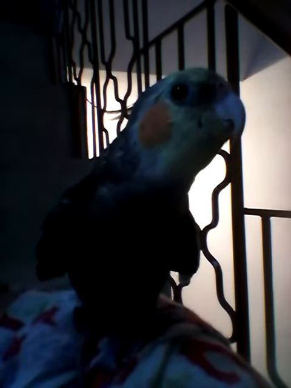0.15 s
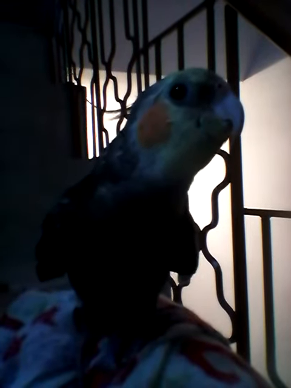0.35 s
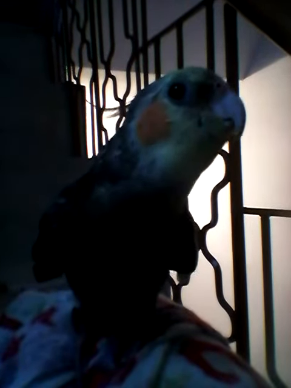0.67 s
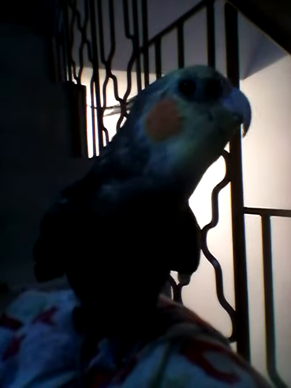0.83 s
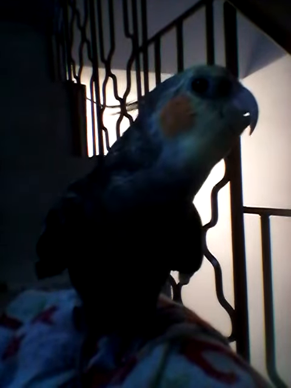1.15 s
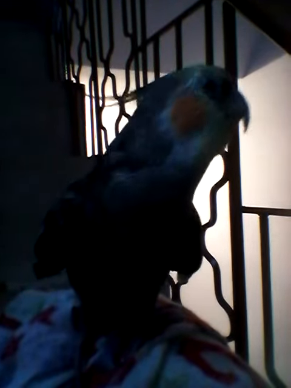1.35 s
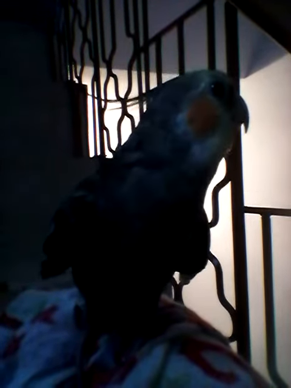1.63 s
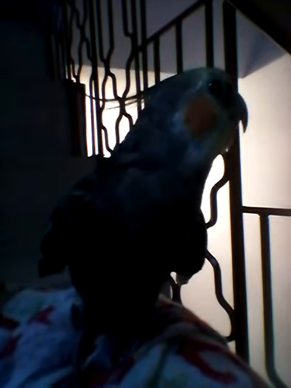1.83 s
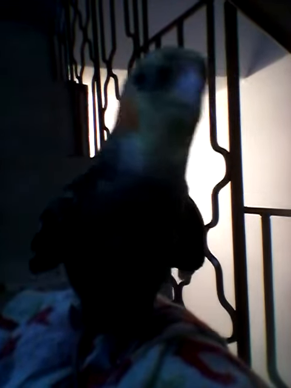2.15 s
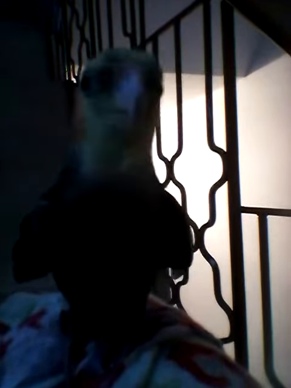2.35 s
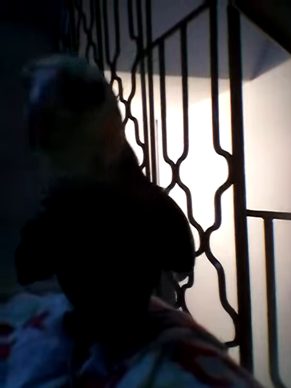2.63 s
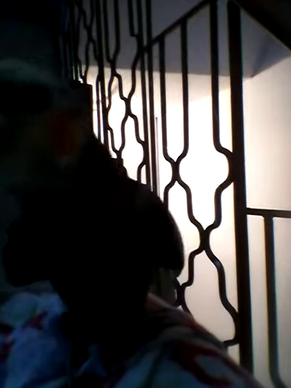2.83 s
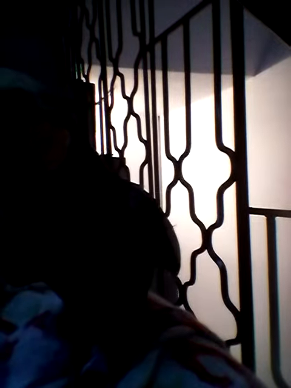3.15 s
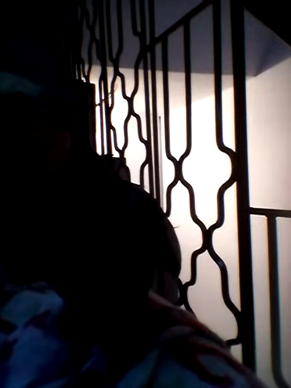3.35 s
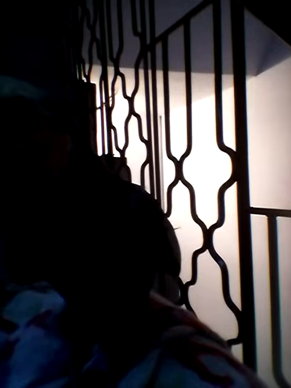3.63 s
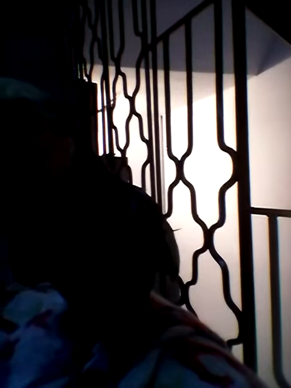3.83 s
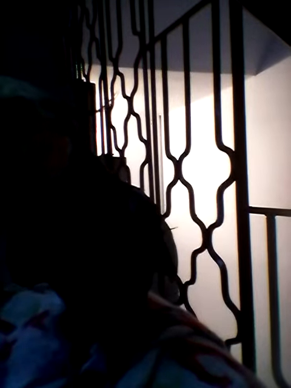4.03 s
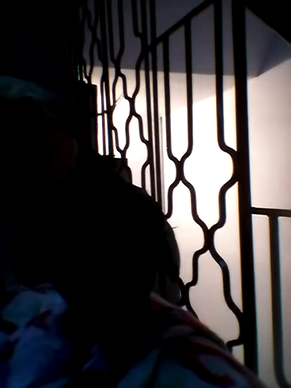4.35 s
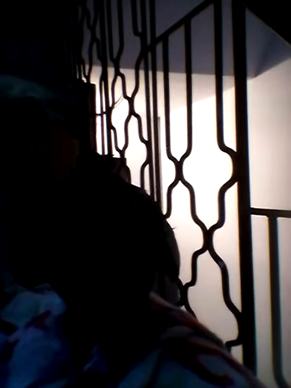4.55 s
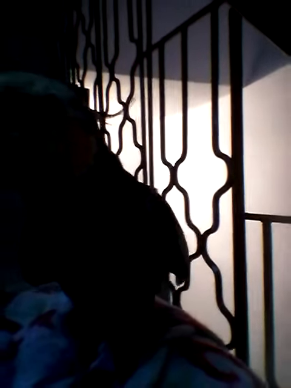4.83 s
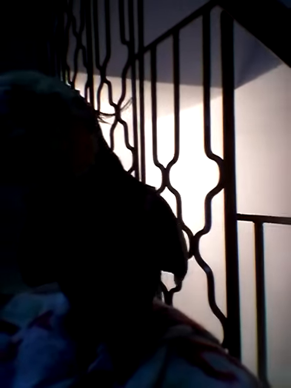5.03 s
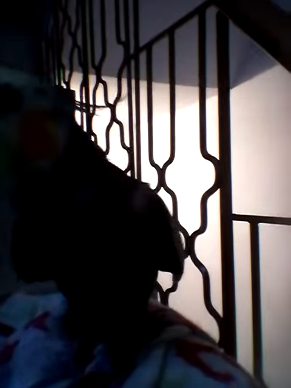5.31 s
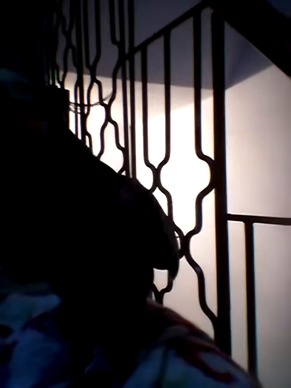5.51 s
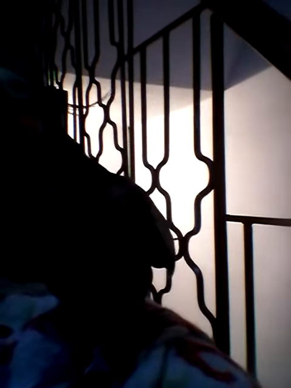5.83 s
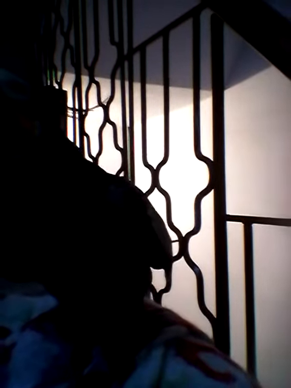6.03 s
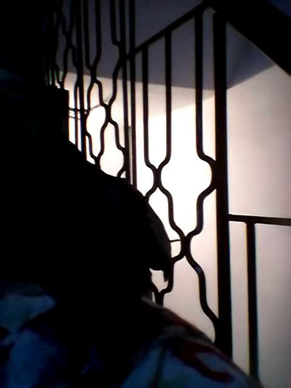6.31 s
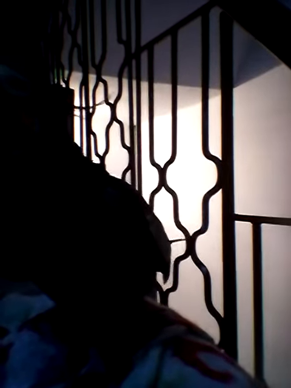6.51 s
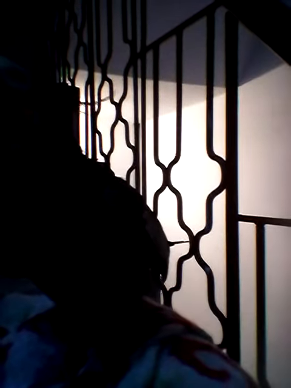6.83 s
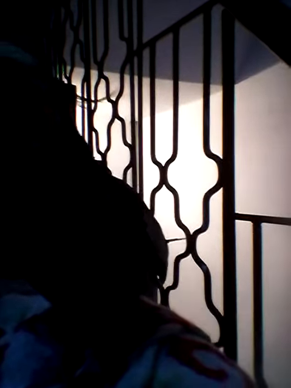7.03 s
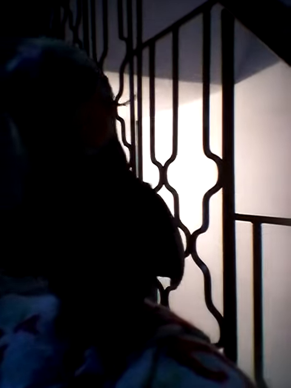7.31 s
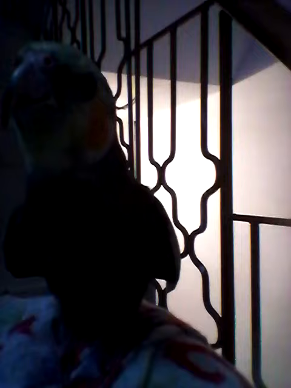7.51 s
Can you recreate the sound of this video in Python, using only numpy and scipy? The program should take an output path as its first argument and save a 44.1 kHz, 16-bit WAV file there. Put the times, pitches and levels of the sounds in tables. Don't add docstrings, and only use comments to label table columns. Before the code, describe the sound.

Indoors in a hard, reverberant room, steady thin insect sizzle and low distant murmur lie under a pet bird's loud whistling. The first phrase mixes held notes and quick chirps, fading into low, reedy tones. Silence but for background follows, then a second phrase climbs to a high whistle and finishes with its loudest note. A distant bird adds a thin chip early and a rough squawk later. Phone sound, bass-light, slightly overloaded on peaks.

```python
import sys
import numpy as np
from scipy import signal
from scipy.fft import rfft, irfft, next_fast_len
from scipy.io import wavfile
from scipy.ndimage import uniform_filter1d, minimum_filter1d

SR = 44100
rng = np.random.default_rng(int(sys.argv[2]) if len(sys.argv) > 2 else 0)


def invert_db(level):
    return 10 ** (np.asarray(level, dtype=float) / 20)


def wav_out(sig):
    wavfile.write(sys.argv[1], SR, np.round(np.clip(np.atleast_2d(sig).T, -1, 1) * 32767).astype(np.int16))


N = 338247


def rms_one(x):
    return x / np.sqrt(np.mean(x ** 2) + 1e-20)


def at_hz(points, hz):
    known_hz, values = np.array(points)[:, 0], np.array(points)[:, 1]
    return np.interp(np.log(np.maximum(hz, 1)), np.log(known_hz), values)


def drift(rate_hz):
    r = np.exp(-2 * np.pi * rate_hz / SR)
    noise = rng.standard_normal(N + SR)
    return rms_one(signal.lfilter([1], [1, -2 * r, r * r], noise)[SR:])


def resonances(x, modes):
    out = 0
    for k, (hz, width, level_db) in enumerate(modes):
        r = np.exp(-np.pi * width / SR)
        ring = signal.lfilter([1, 0, -1], [1, -2 * r * np.cos(2 * np.pi * hz / SR), r * r], x)
        out = out + (-1) ** k * invert_db(level_db) * (1 - r * r) / 2 * ring
    return out


# frequency in Hz, level in dB per Hz.
MURMUR_COLOUR = [(120, -30), (200, -14), (380, 0), (1000, -6.5), (2000, -12), (3000, -15), (4300, -10),
                 (4900, -13), (5500, -9), (7600, -14), (9700, -24), (10900, -18), (12500, -24),
                 (15500, -22)]


def murmur():
    size = next_fast_len(N)
    colour = invert_db(at_hz(MURMUR_COLOUR, np.arange(size // 2 + 1) * SR / size))
    noise = irfft(rfft(rng.standard_normal(size)) * colour, size)[:N]
    return invert_db(-47.5) * rms_one(noise)


# frequency in Hz, width in Hz, level in dB.
INSECT_WINGS = [(6882, 198, -1), (6667, 266, -1.5), (5970, 600, -16.5)]


def insects():
    wing_hz, chirp_hz, level_db = 75.3, 9.6, -39.5
    t = np.arange(N) / SR
    wings_db = 0.89 * np.sin(2 * np.pi * wing_hz * t + 2.7 * drift(2.2))
    chirps_db = np.sin(2 * np.pi * chirp_hz * t + 1.3 * drift(0.17))
    band = resonances(resonances(rng.standard_normal(N), INSECT_WINGS), [(6310, 1400, 0)])
    return invert_db(level_db) * rms_one(band * invert_db(wings_db + chirps_db + 0.7 * drift(0.17)))


# start in seconds, level in dB, length in seconds.
PUFFS = [(0.668, -33.5, 0.027), (1.134, -32.5, 0.04), (1.396, -35.5, 0.042), (1.944, -50, 0.031),
         (2.189, -29.5, 0.023), (2.46, -30.5, 0.028), (2.762, -33, 0.033), (3.043, -32, 0.03),
         (5.051, -32.5, 0.017), (5.513, -30.5, 0.031), (5.777, -30.5, 0.026), (6.281, -33, 0.035),
         (6.56, -33, 0.038), (6.824, -28, 0.025), (7.104, -31, .04)]
# frequency in Hz, width in Hz, level in dB.
THROAT = [(600, 1460, -9.5), (1600, 1940, -1), (2400, 330, 7), (3800, 3600, -24.5)]


def puffs():
    t, shape = np.arange(N) / SR, np.zeros(N)
    for s, level_db, length in PUFFS:
        corners = [s, s + 0.063 * length, s + length, s + length]
        shape += invert_db(level_db) * np.interp(t, corners, [0, 0.98, 1, 0])
    air = resonances(rng.standard_normal(N), THROAT)
    soft_air = signal.sosfilt(signal.butter(3, 4300, fs=SR, output="sos"), air)
    return shape * rms_one(soft_air)


# lift-off in dB, share of the leap done at the shoulder, fade while held in dB,
# fall in seconds, fall as a pitch ratio, fall in dB.
PIP_MANNER = (-27, .94, -3, .008, .94, -19)
CREEP_MANNER = (-30, .75, -1.5, 0.0074, .97, -18)
ARCH_MANNER = (-30, .85, -2.5, .016, .72, -13)


def short_note(row, manner):
    s, climb, length, top, level_db = row
    lift_db, shoulder, fade_db, fall, ratio, fall_db = manner
    bow = 0.27
    low = max(1620, top - 700)
    held = length - climb - fall
    sag, end = 0.98 * top, ratio * top
    return [(s, low, lift_db),
            (s + climb, low + shoulder * (top - low), level_db - 1),
            (s + climb + 0.65 * held, top, level_db),
            (s + climb + held, sag, level_db + fade_db),
            (s + length - fall / 2, sag + bow * (end - sag), level_db + fade_db + bow * fall_db),
            (s + length, end, level_db + fall_db)]


def scooped(note):
    (s0, hz0, db0), (s1, hz1, db1) = note[:2]
    wait = (s0 - 0.012, hz0, db0 - 12)
    halfway = ((s0 + s1) / 2, hz0 + 0.54 * (hz1 - hz0), db0 + 0.67 * (db1 - db0))
    return [wait, note[0], halfway, *note[1:]]


# time in seconds, pitch in Hz, level in dB.
OPENING = [(.686, 1560, -25), (.709, 1905, -10.5), (.719, 2371, -7), (.731, 2429, -12.5),
           (.789, 2500, -8.5), (.877, 2390, -19.5), (.937, 2419, -13), (.977, 2385, -10), (.985, 2470, -36)]
WARBLE = [(1.424, 1952, -26), (1.444, 2575, -10.5), (1.495, 2669, -10.5), (1.556, 2552, -11),
          (1.64, 2696, -13), (1.682, 2590, -10.5), (1.735, 2685, -11), (1.754, 2564, -7.5),
          (1.762, 1870, -20)]
LOW_RISE = [(3.062, 1468, -27), (3.178, 1674, -23), (3.219, 1709, -14.5), (3.248, 1750, -13.5),
            (3.262, 1758, -17.5), (3.275, 1692, -20.5), (3.29, 1598, -29.5), (3.305, 1510, -33)]
LOW_HOLD = [(3.327, 1525, -24.5), (3.426, 1794, -12.5), (3.475, 1664, -15.5), (3.553, 1807, -15),
            (3.589, 1786, -14.5), (3.616, 1685, -19), (3.736, 1744, -15), (3.764, 1765, -19),
            (3.768, 1786, -48)]
REOPENING = [(5.068, 1647, -25), (5.097, 2400, -10), (5.107, 2471, -9.5), (5.209, 2394, -7.5),
             (5.232, 2385, -16), (5.245, 2305, -22), (5.337, 2444, -6), (5.359, 2340, -15),
             (5.365, 2520, -25)]
HIGH_HOLD = [(5.801, 2000, -24), (5.824, 2535, -7.5), (5.858, 2889, -7), (5.883, 3013, -10.5),
             (6.035, 3082, -8.5), (6.093, 3014, -9), (6.103, 2994, -8), (6.113, 2750, -12),
             (6.12, 2670, -21)]
CLOSING = [(7.133, 1676, -26), (7.16, 2351, -4.5), (7.179, 2450, 0), (7.19, 2491, -6.5), (7.346, 2347, -8),
           (7.383, 2528, -12), (7.436, 2510, -6), (7.48, 2347, -15), (7.489, 1830, -43.5)]
# lift-off in seconds, climb in seconds, length in seconds, top pitch in Hz, level in dB.
PIPS = [
    (1.156, .024, .074, 2625, -9.5),
    (6.583, .026, .069, 2455, -6.5),
    (6.843, .034, .068, 2172, -7.5),
]
ARCHES = [
    (1.954, .026, .069, 2323, -8.5),
    (2.197, .038, .089, 2353, -9),
    (2.48, .028, .095, 2277, -18),
    (2.779, .04, .093, 2229, -11),
]
CREEPS = [
    (5.535, .015, .079, 2800, -6),
    (6.297, .018, .09, 2895, -4.5),
]


def song():
    kinds = [(PIPS, PIP_MANNER), (CREEPS, CREEP_MANNER), (ARCHES, ARCH_MANNER)]
    short = [short_note(row, manner) for rows, manner in kinds for row in rows]
    held = [OPENING, WARBLE, LOW_RISE, LOW_HOLD, REOPENING, HIGH_HOLD, CLOSING]
    in_order = sorted(short + held, key=lambda note: note[0][0])
    return [scooped(note) for note in in_order]


def glide(note, waver):
    s, hz_points, db_points = np.transpose(note)
    at = np.arange(round(s[0] * SR), round(s[-1] * SR))
    hz = uniform_filter1d(np.interp(at / SR, s, hz_points), size=130)
    level_db = uniform_filter1d(np.interp(at / SR, s, db_points), size=130)
    phase = np.cumsum(2 * np.pi * hz * (1 + waver[at]) / SR)
    edge = np.clip(np.minimum(at - at[0], (at[-1] - at) / 2) / 90, 0, 1)
    return at, hz, phase, np.sqrt(2) * invert_db(level_db) * edge


# frequency in Hz, dB relative to the note.
OCTAVE = [(3000, -24), (3500, -17.5), (4000, -21), (4300, -35), (4800, -36), (5300, -28), (6100, -26)]
# frequency in Hz, dB relative to the note.
WINDPIPE = [(4000, -20.5), (5200, -24.5), (6500, -30), (7500, -40), (9000, -42), (10500, -43), (12200, -52),
            (13800, -45), (15000, -58), (16000, -67)]
# frequency in Hz, dB relative to the note.
HALF_LINES = [(700, -39), (900, -52.5), (1250, -40), (1600, -59), (2000, -42.5), (2500, -37), (3000, -51),
              (3700, -42), (4600, -54.5), (6500, -54)]
# half tones in dB, octave in dB, high overtones in dB.
NOTE_COLOUR = [(0, 1.5, 0.6), (-1.5, -5, -4), (2.5, 1.5, 2.5), (6, -8, 0.6), (2, 2.5, 4), (5.5, -10, -3),
               (6, 1.5, -3), (7, 1.5, 1.2), (-3.5, 0.6, 2.2), (0.2, -3, -3), (-17, -2.5, -3),
               (-20, -2, 3.5), (-13, -1.5, 3.5), (-12, 2.5, 2.2), (-11, 4, 6), (-6, -1, 0.6)]


def cockatiel():
    out, waver, flicker = np.zeros(N), 0.0027 * drift(54), drift(22)
    slip = 0.55 * drift(150)
    breath = rms_one(resonances(rng.standard_normal(N), THROAT))
    for note, (half_db, twice_db, bright_db) in zip(song(), NOTE_COLOUR):
        at, hz, phase, swell = glide(note, waver)
        moving = np.tanh(np.abs(np.gradient(hz)) * SR / 15000)
        octave_db = at_hz(OCTAVE, 2 * hz) + twice_db + 2.5 * flicker[at - 900] + 6 * moving
        notch_db = -11 * np.exp(-((2 * hz - 4520) / 300) ** 2)
        tone = np.sin(phase) + invert_db(octave_db + notch_db) * np.sin(2 * phase)
        tone += invert_db(-42) * breath[at]
        effort_db = 2 * np.log10(swell / 0.83 + 0.027)
        for k in range(3, 9):
            level_db = at_hz(WINDPIPE, k * hz) + bright_db + effort_db + 3 * flicker[at - 900 * k]
            tone += (k * hz < 0.45 * SR) * invert_db(level_db) * np.sin(k * phase)
        soft_db = half_db - 8.5 * np.log10(swell / 0.36 + 0.022)
        for k in range(1, 8, 2):
            level_db = at_hz(HALF_LINES, k * hz / 2) + soft_db + 3.8 * flicker[at]
            tone += invert_db(level_db) * np.sin(k * phase / 2 + slip[at])
        out[at] += swell * tone
    return out


# time in seconds, pitch in Hz, level in dB.
OTHER_BIRD = [
    [(1.85, 3350, -46), (1.86, 3134, -37.5), (1.88, 3114, -43.5), (1.89, 3160, -34)],
    [(1.893, 4250, -50.5), (1.9, 3680, -32.5), (1.91, 3075, -45.5), (1.92, 2960, -31), (1.95, 2866, -44),
     (1.975, 2980, -51)],
]
# multiple of the pitch, level in dB.
OTHER_OVERTONES = [(2, -5), (3, -14), (4, -19)]


def other_bird():
    out, waver, shake = np.zeros(N), 0.0054 * drift(300), invert_db(1.6 * drift(200))
    for note in OTHER_BIRD:
        at, hz, phase, swell = glide(note, waver)
        overtones = sum(invert_db(level_db) * np.sin(k * phase) for k, level_db in OTHER_OVERTONES)
        out[at] += swell * shake[at] * (np.sin(phase) + overtones)
    return out


# start in seconds, length in seconds, centre in Hz, width in Hz, level in dB.
RASPS = [
    (1.876, .09, 4500, 3000, -43),
    (1.884, 0.079, 11000, 3880, -56),
    (5.87, 0.15, 3800, 700, -43.5),
    (5.963, 0.086, 5090, 508, -45.5),
    (5.972, 0.033, 1990, 600, -46.5),
    (6.047, 0.038, 2040, 717, -42.5),
]


def rasps():
    t, out = np.arange(N) / SR, np.zeros(N)
    grit = rng.standard_normal(N) * invert_db(5.3 * drift(280))
    for s, length, hz, width, level_db in RASPS:
        mode = [(hz, width, 0)]
        colour = resonances(resonances(grit, mode), mode)
        corners = [s, s + 0.14 * length, s + 0.76 * length, s + length]
        out += invert_db(level_db) * np.interp(t, corners, [0, 0.91, 1, 0]) * rms_one(colour)
    return out


# frequency in Hz, time to die by 60 dB in seconds.
ROOM_T60 = [(1000, 0.62), (1750, 0.77), (2500, 0.77), (4000, 1), (8000, 1), (13000, 0.47)]


def room(x):
    t, tail = np.arange(SR + SR // 2) / SR, 0
    edges = 500 * 2 ** np.arange(0, 5.1, .5)
    for low, high in zip(edges, edges[1:]):
        band_filter = signal.butter(2, [low, high], "band", fs=SR, output="sos")
        band = signal.sosfilt(band_filter, rng.standard_normal(len(t)))
        decay = invert_db(-60 * t / at_hz(ROOM_T60, np.sqrt(low * high)))
        tail = tail + band / np.sqrt(high - low) * decay
    build_up = np.clip((t - .003) / 0.0037, 0, 1)
    early_boost = 1 + 2 * np.exp(-t / 0.038)
    return signal.fftconvolve(x, tail * build_up * early_boost * 0.49)[:N]


def scene():
    near = cockatiel() + puffs()
    far = other_bird() + rasps()
    birds = invert_db(-1) * near + far + invert_db(-11) * room(near + 3.5 * far)
    return (birds + insects() + murmur())[None]


# frequency in Hz, dB per kHz relative to the whole moment.
MASKED = [(60, -55), (170, -47.5), (600, -45.5), (1100, -42), (1700, -50), (3500, -53), (6000, -61.5),
          (9000, -48.5), (14000, -46.5)]
# frequency in Hz, dB relative to the band.
GRAIN = [(500, -12), (2500, -27), (4000, -8), (8000, -3), (12000, 0)]


def thin_and_roughen(x, chance_db=3.5):
    hz, t, z = signal.stft(x, SR, "hann", nperseg=1024, noverlap=512)
    starts = np.cumsum(np.clip(np.arange(46) // 2, 2, 14)) - 2
    band = np.clip(np.searchsorted(starts, np.arange(len(hz)), "right") - 1, 0, None)
    power = np.abs(z) ** 2 + 1e-20
    bins = np.diff(np.append(starts, len(hz)))[:, None]
    mean = np.add.reduceat(power, starts, axis=0) / bins
    whole = uniform_filter1d(power.sum(0), size=3)
    per_khz_db = 10 * np.log10(mean * 1000 / hz[1] / whole)
    luck = rms_one(uniform_filter1d(rng.standard_normal(mean.shape), size=4))
    level_db = uniform_filter1d(per_khz_db, size=3)
    nearby_db = -minimum_filter1d(-level_db, size=13, axis=0) - 47
    limit_db = np.maximum(at_hz(MASKED, hz[starts])[:, None], nearby_db)
    kept = level_db + chance_db * luck > limit_db
    grain = np.sqrt(mean / 2) * invert_db(at_hz(GRAIN, hz[starts]))[:, None]
    noise = rng.standard_normal(z.shape) + 1j * rng.standard_normal(z.shape)
    z = (z + grain[band] * noise) * kept[band]
    return signal.istft(z, SR, "hann", nperseg=1024, noverlap=512)[1][:N]


def roll_off(x):
    return signal.sosfilt(signal.butter(12, 15770, fs=SR, output="sos"), x)


def record(dry):
    thin = signal.sosfilt(signal.butter(3, 130, "high", fs=SR, output="sos"), dry)
    clipped = np.clip(thin[0], -.68, .69)
    mix = thin_and_roughen(clipped)[None]
    return roll_off(mix)


dry = scene()
out = record(dry)
wav_out(out)
```